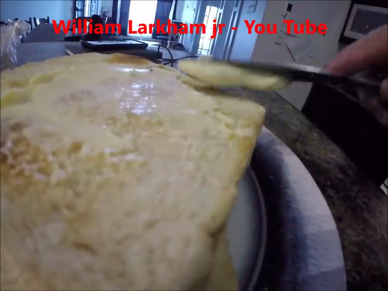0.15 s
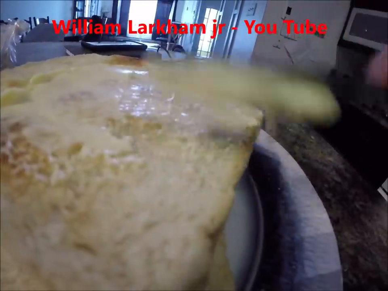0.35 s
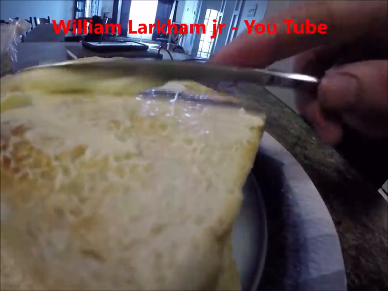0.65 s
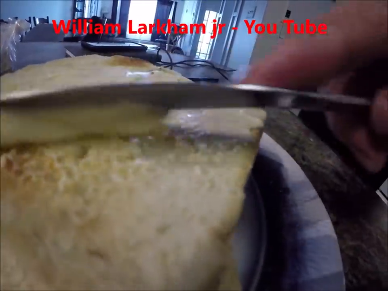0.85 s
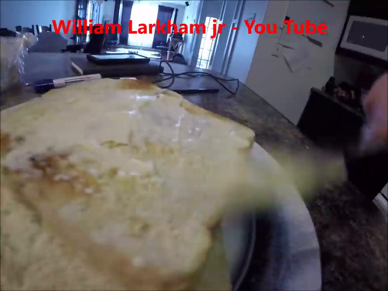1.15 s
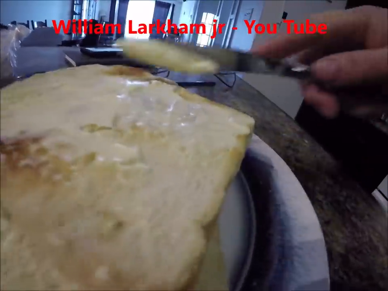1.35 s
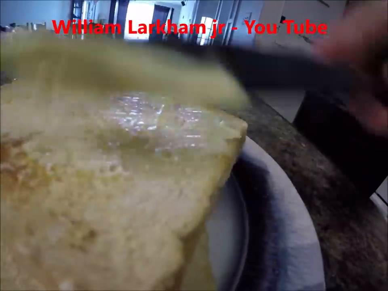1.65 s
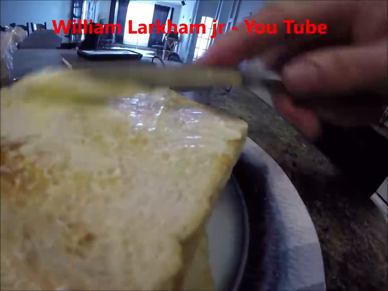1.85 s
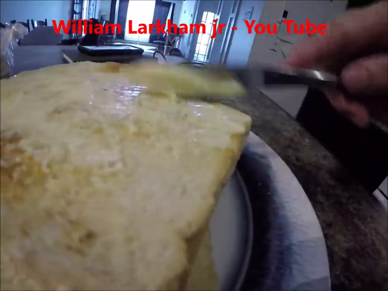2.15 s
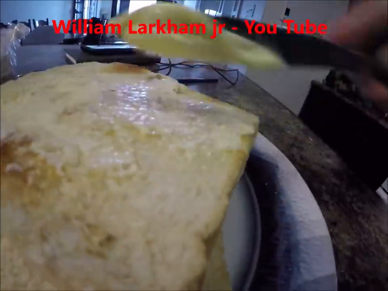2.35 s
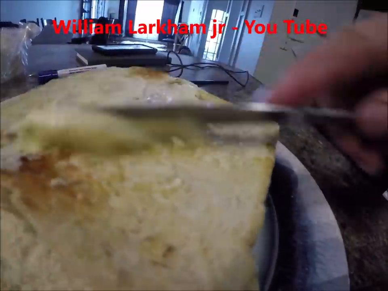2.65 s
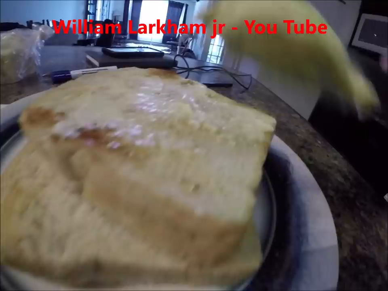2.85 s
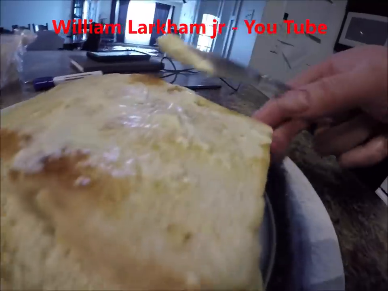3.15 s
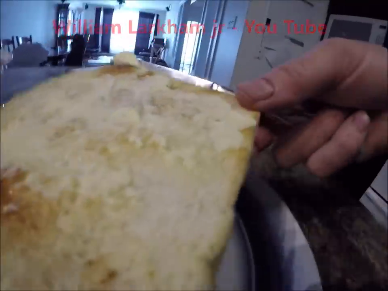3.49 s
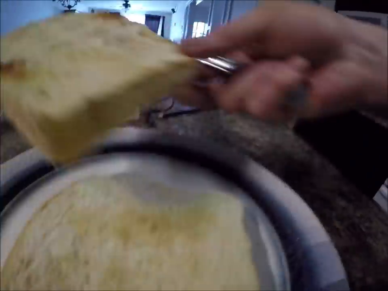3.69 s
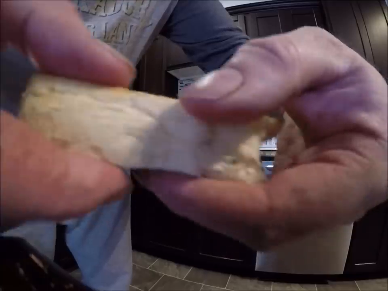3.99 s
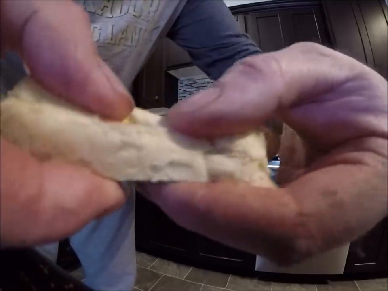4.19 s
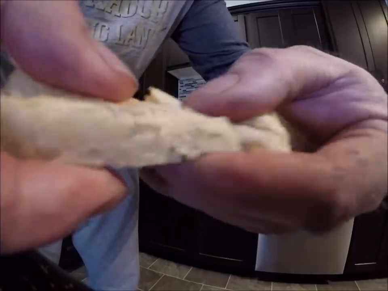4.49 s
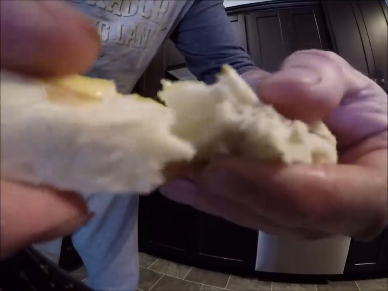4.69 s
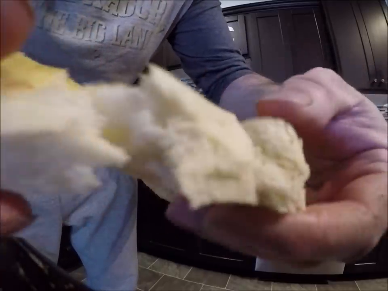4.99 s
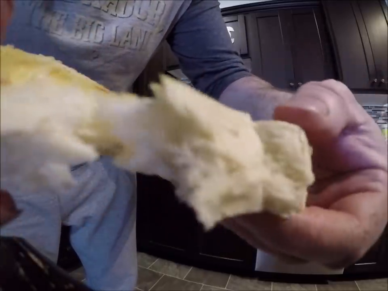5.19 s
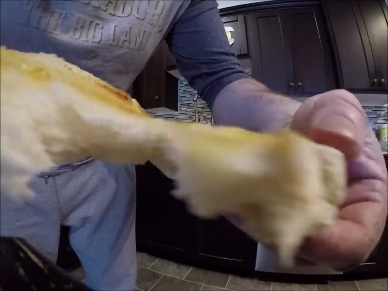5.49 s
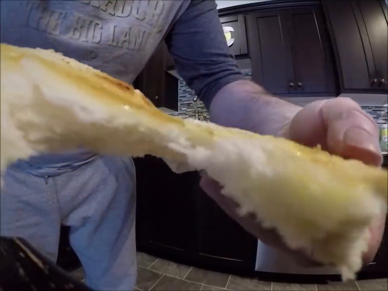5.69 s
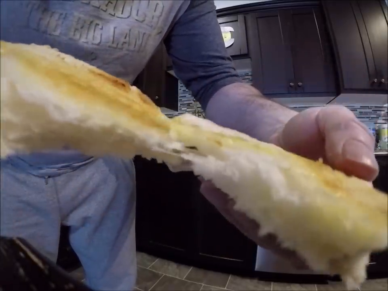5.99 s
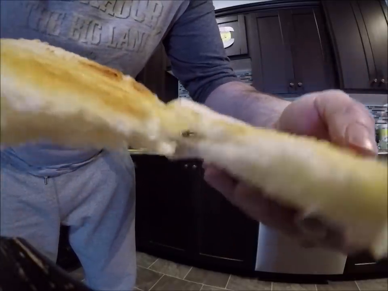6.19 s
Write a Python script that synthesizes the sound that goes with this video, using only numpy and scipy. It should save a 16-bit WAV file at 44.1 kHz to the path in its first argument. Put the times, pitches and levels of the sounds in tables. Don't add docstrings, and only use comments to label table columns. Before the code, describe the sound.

Quick crisp rasps of a knife buttering crusty toast, a plate clink and low bumps, a brief dropout, then soft bread tearing with small crust snaps.

```python
import sys
import numpy as np
from scipy import signal
from scipy.fft import rfft, irfft, next_fast_len
from scipy.io import wavfile
from scipy.ndimage import uniform_filter1d

SR = 44100
rng = np.random.default_rng(int(sys.argv[2]) if len(sys.argv) > 2 else 0)


def wrap_up_sound(samples):
    columns = np.atleast_2d(samples).T
    tamed = np.clip(columns, -1, 1)
    steps = np.round(tamed * 32767).astype(np.int16)
    wavfile.write(sys.argv[1], SR, steps)


def elevation(decibels):
    levels = np.asarray(decibels, float)
    return 10 ** (levels / 20)


N = 279368
TIME = np.arange(N) / SR
SIZE = next_fast_len(N)
HZ = np.maximum(np.fft.rfftfreq(SIZE, 1 / SR), 1)
DROP_S = 3.8278, 3.8612

# (start [s], length [s], pressure peak [0-1 of length], peak pressure [dB], blade speed [dB])
STROKES = [(0.0, 0.13, 0.58, -25.5, -30.5), (0.349, 0.027, 0.2, -39, -39), (0.365, 0.09, 0.52, -25.5, -29),
           (0.814, 0.063, 0.57, -32.5, -30), (0.876, 0.14, 0.39, -37, -34.5), (0.992, 0.067, 1, -34, -36),
           (1.045, 0.225, 0.13, -32.5, -31), (1.145, 0.11, 0.6, -31.5, -24),
           (1.544, 0.025, 0.88, -30.5, -29.5), (1.58, 0.022, 0.6, -25, -23),
           (1.607, 0.045, 0.62, -25, -31.5), (1.646, 0.1, 0.58, -22.5, -28), (2.012, 0.1, 0.34, -25, -29),
           (2.114, 0.02, 0.72, -25, -32), (2.316, 0.09, 0.88, -21, -32), (2.629, 0.12, 0.33, -33.5, -33),
           (2.756, 0.11, 0.7, -23.5, -30), (2.846, 0.048, 0.66, -21.5, -30)]
# (crust dryness [dB], slice boom [Hz], blade top [dB])
TOAST = [(0, 510, 0.5), (3, 600, 4), (-2, 370, -1.5), (-6, 730, -0.5), (-5, 570, -5.5), (1.5, 740, 0.5),
         (0, 380, -1.5), (-0.5, 330, -2), (0.5, 450, 2), (-4, 660, -2), (-2, 570, 2.5), (-0.5, 460, 3),
         (1.5, 530, 5.5), (1, 420, 6), (-0.5, 446, 5.5), (1, 770, -6), (1, 470, 6), (1, 500, -2)]
# (time [s], peak [dB], crackle [dB], blade
# [dB])
CATCHES = [(0.34, -11.5, -11, -13.5), (0.366, -10.5, -17, -28), (0.0572, -21, -3, 0.5),
           (0.3822, -21.5, -2.5, -7), (0.625, -51, -3, -5), (0.748, -35, -17, -12), (0.787, -49, -3, -3),
           (0.8305, -28, -11, -7), (0.949, -27, -10, -4), (1.0375, -31, -11, 0), (1.069, -22.5, -18, 1),
           (1.183, -19, -12, 2), (1.667, -23, -10, -14), (2.0291, -19.5, -1, -10), (2.65, -27, -10, 3),
           (2.717, -30, -5, 1), (2.7964, -21, 0, -7), (0.812, -31, -12, 2.5), (1.006, -24, -7, 0),
           (1.087, -24, -2, -12), (1.131, -22, -1, 0), (1.164, -24, -13, 7), (1.545, -30, 2.5, 2),
           (1.555, -34, -18, -10), (1.585, -18, -12, -9), (1.633, -9.5, -22, -10), (1.999, -25.5, -17, -17),
           (2.011, -25, -13, -2), (2.313, -9, -10, -10), (2.355, -11.5, -10, -6.5),
           (2.639, -25.5, -28, 3.5), (2.686, -31, 6, 0), (2.766, -22, -6, -7), (2.815, -12, -28, -6.5),
           (2.86, -10.5, -24, -3.5), (2.88, -21.5, -21, 7), (3.273, -28, -11, -3), (3.498, -32, -8, -17),
           (3.635, -16.5, -18, -26)]
# (time [s], length [s], depth [dB])
STICKS = [(0.903, 0.01, -7), (0.932, 0.018, -3.5), (1.03, 0.018, -2.5), (1.082, 0.0027, -4),
          (1.18, .007, -5), (1.197, 0.0068, -3.5), (1.61, 0.0054, 1), (1.663, .008, -3), (1.57, 0.0085, -3),
          (2.677, 0.0074, -7.5), (2.75, 0.0087, -10), (2.808, 0.0071, -5), (2.845, 0.021, -4),
          (2.88, 0.012, -6)]
# (time [s], pitch [Hz])
ANGLE = [(0, 6350), (.3, 6140), (.46, 6300), (.81, 7200), (1.0, 7200), (1.07, 7650), (1.13, 6600),
         (1.19, 6500), (1.24, 7440), (1.55, 6100), (1.75, 6560), (2.0, 6660), (2.3, 5600), (2.42, 5900),
         (2.64, 6200), (2.77, 6300), (2.9, 7140)]
# (frequency [Hz], level per Hz [dB])
CRUMB = [(60, -28), (130, -10), (270, -4.5), (420, -1), (600, 3), (850, -3.5), (1200, -6.5), (1550, -9),
         (1780, -19.5), (3000, -58)]
CRACKLE = [(1000, -16.5), (1800, 10), (2500, 6.5), (3000, 1.5), (4000, 3.5), (4700, 4), (5500, -24)]
BLADE = [(3500, -49.5), (5000, 3.5), (5600, 14), (7800, 5.5), (8800, 5), (10300, -10), (12500, -7.5),
         (14000, -16), (16000, -47)]
STROKE_SHAPE = 0.0034, 11, 7.7, 0.011
BLADE_FOLLOWS, CRUST_FOLLOWS = 0.74, 0.28
CRUST_FROM_SPEED, CRUST_DB = 0.92, -9


def knife():
    slip = grains(rate_hz=7000, spread_db=2.5, patchy_db=2.0, patch_hz=86.0)
    chatter = grains(rate_hz=7000, spread_db=2.5, patchy_db=2.0, patch_hz=86.0)
    stuck_db = sum(depth_db * np.exp(-((TIME[:3 * SR] - at) / hold) ** 4) for at, hold, depth_db in STICKS)
    slip[:3 * SR] *= elevation(stuck_db)
    chatter[:3 * SR] *= elevation(stuck_db)

    start, length, peak, press_db, speed_db = np.transpose(STROKES)
    dry_db, _, top_db = np.transpose(TOAST)
    crust_db = CRUST_DB + dry_db + press_db + CRUST_FROM_SPEED * (speed_db - press_db)
    crumb = swells(start, length, peak, press_db, STROKE_SHAPE)
    crust = swells(start, length, peak, crust_db, STROKE_SHAPE, CRUST_FOLLOWS)
    steel = swells(start, length, peak, speed_db, STROKE_SHAPE, BLADE_FOLLOWS)

    s, db, crackle_db, blade_db = np.transpose(CATCHES)
    edge = chatter * steel + bursts(s, elevation(db + blade_db - 2.5), decay_s=0.0039)
    lag = 2 * SR / np.interp(TIME, *np.transpose(ANGLE)) + walk(29.12)
    mirrored = edge + 0.31 * np.interp(np.arange(N) - lag, np.arange(N), edge)
    rings = elevation(9) * blade_rings(edge * np.clip(steel / (crumb + 1e-9), 0.35, 1))
    ringing = elevation(-6.0) * causal(mirrored, unit(colour(BLADE))) + rings
    below = signal.sosfiltfilt(signal.butter(3, 8400, fs=SR, output="sos"), ringing)
    ringing = below + (ringing - below) * elevation(per_stroke(top_db))

    boom = booms(slip * crumb ** 1.774) * elevation(38.5)
    soft = slip * crumb + bursts(s, elevation(db - 14.5), decay_s=0.0076)
    crackle = (0.74 * slip + 0.5 * chatter) * crust
    crackle += bursts(s, elevation(db + crackle_db - 5.5), decay_s=0.0025)
    soft, crackle = causal(soft, unit(colour(CRUMB))), causal(crackle, unit(colour(CRACKLE)))
    return soft + boom + crackle + ringing + singing(chatter)


def per_stroke(values):
    landed = np.searchsorted(np.transpose(STROKES)[0] - 0.004, TIME) - 1
    return np.asarray(values)[np.maximum(landed, 0)]


def booms(drive):
    x = np.zeros(N)
    edges = [int(row[0] * SR) for row in STROKES] + [3 * SR]
    for i, j, (_, hz, _) in zip(edges, edges[1:], TOAST):
        part = signal.lfilter(*signal.iirpeak(hz, 2.5, SR), np.r_[drive[i:j], np.zeros(2000)])
        x[i:i + len(part)] += part
    return x


BLADE_HZ = [2050, 4220, 5600, 6200, 6380, 7300, 7560, 8750, 9800, 12400]
BLADE_DB = [-9, -11, -6, 0, -3, -3, -2, -9, -5, -17]


def blade_rings(drive):
    x = np.zeros(N)
    for hz, db in zip(BLADE_HZ, BLADE_DB):
        x += elevation(db) * signal.lfilter(*signal.iirpeak(hz, 45, SR), drive * elevation(6 * walk(20)))
    return x


# (start [s], length [s], mode [Hz], level
# [dB])
SINGS = [(0.0, 0.14, 6150, -42), (0.02, 0.1, 1390, -35), (0.372, 0.043, 1490, -28),
         (0.412, 0.048, 373, -26.5), (1.647, 0.078, 780, -34), (2.02, 0.057, 560, -33),
         (2.357, 0.065, 397, -27.5), (2.813, 0.055, 560, -35), (2.846, 0.056, 484, -26),
         (3.496, 0.065, 1990, -42), (3.564, .025, 1090, -36), (5.152, 0.088, 610, -53),
         (0.918, .07, 1520, -43), (1.015, .06, 1410, -34), (1.62, 0.038, 560, -33), (1.727, .02, 446, -41),
         (1.15, .05, 4180, -37), (5.37, 0.077, 635, -52), (0.373, 0.058, 6260, -36),
         (0.386, 0.042, 3800, -40), (0.815, 0.087, 9700, -45), (0.82, 0.05, 7850, -47),
         (0.84, .03, 4070, -40.5), (0.945, .06, 7250, -42), (0.95, .06, 4100, -45), (0.95, .07, 6100, -48),
         (1.04, 0.071, 7400, -43), (1.056, .03, 9400, -41), (1.08, 0.046, 6950, -32),
         (1.105, 0.11, 6440, -30), (1.112, .09, 9620, -34.5), (1.154, 0.033, 7600, -35),
         (1.125, 0.085, 2040, -38.5), (1.201, 0.054, 7400, -33), (1.215, 0.034, 4250, -31.5),
         (1.224, 0.034, 5480, -32), (1.593, 0.02, 6000, -39), (1.677, 0.057, 6300, -40),
         (1.603, 0.23, 7750, -50), (2.023, 0.13, 6280, -38), (2.024, 0.13, 7400, -43),
         (2.314, 0.076, 5580, -35), (2.31, 0.075, 7580, -36.5), (2.638, .095, 6300, -41),
         (2.64, 0.075, 7500, -42), (2.647, .08, 5500, -45), (2.756, 0.022, 6200, -37),
         (2.849, 0.052, 7300, -31),
         (0.0, 0.032, 1440, -33),
    (0.105, 0.021, 496, -29),
    (0.838, 0.026, 200, -37),
    (0.93, 0.079, 218, -34.5),
    (1.12, .028, 500, -30),
    (1.2, .03, 390, -29.5),
    (4.7, .1, 320, -41),
    (2.7, .04, 1440, -34),
    (2.8, .04, 1430, -38),
]
SING_WIDTH_HZ, SING_DB = 130, 23


def singing(drive):
    x = np.zeros(N)
    for s, length, hz, db in SINGS:
        i, n = int(s * SR), int(length * SR)
        fed = np.r_[drive[i:i + n] * np.hanning(n) ** 0.4, np.zeros(400)]
        x[i:i + n + 400] += elevation(db + SING_DB) * signal.lfilter(*signal.iirpeak(hz, hz / SING_WIDTH_HZ, SR), fed)
    return x


# (start [s], length [s], peak [0-1 of length], squeeze [dB], rip [dB])
TEAR = [(3.421, 0.036, 0.9, -44, -63), (3.5, 0.029, 0.11, -30, -57.5), (3.524, 0.048, 0.34, -33, -66),
        (3.527, 0.064, 0.45, -46, -51), (3.635, 0.033, 0, -44, -53), (3.663, 0.039, 1, -39, -45.5),
        (3.851, 0.029, 1, -50.5, -66), (4.22, 0.085, 0.75, -40.5, -48.5), (4.417, 0.14, 0.2, -55, -61.5),
        (4.553, 0.044, 0.57, -50, -56), (4.608, 0.068, 0.35, -46.5, -53), (4.675, 0.056, 0.3, -47.5, -60),
        (4.718, 0.09, 0.3, -49.5, -66), (4.857, 0.024, 0.4, -46.5, -58.5), (4.972, 0.071, 0.4, -54, -62),
        (5.122, 0.043, 0.97, -54.5, -63.5), (5.36, 0.14, .6, -56, -71), (5.442, 0.38, 0.14, -56, -78)]
# (time [s], peak [dB], low share [dB])
SNAPS = [(3.8148, -34.5, -11), (3.566, -41, -20), (3.575, -36, -20), (3.558, -47, -5), (3.581, -42, 0),
         (4.2125, -44, -14), (4.2365, -26, -10), (4.247, -39, -10), (4.2515, -40, -7), (4.2675, -37, -15),
         (4.2865, -26.5, -5.5), (4.2985, -31, -7), (4.3345, -36, -17), (4.362, -40, -16), (4.601, -34, -6),
         (4.612, -36.5, 0), (4.988, -41, -5), (5.561, -42, -13), (4.864, -47, -3), (3.597, -38, 2),
         (3.9238, -43.5, 4), (3.9912, -37.5, -26), (4.1918, -40.5, -7), (4.223, -35, -18),
         (4.232, -30, -10), (4.2647, -22, -7), (4.283, -29, -9), (4.305, -22, 0), (4.328, -26, -5),
         (4.4297, -44, -7), (4.4645, -42, 0), (4.5027, -40, 2), (4.532, -31, -14), (4.544, -30, -11),
         (4.562, -40, -15), (4.606, -32.5, -5), (4.654, -43.5, 9), (4.7244, -35, -5), (4.85, -35, -15),
         (5.3043, -40.5, -9), (5.4046, -47, -13), (5.464, -37, -8), (5.5, -44, 0), (5.5305, -40.5, -16),
         (5.597, -36, -9), (5.9095, -41, -22), (5.9836, -44, -20)]
# (frequency [Hz], level per Hz [dB])
FRAY = [(3500, -38), (5000, 0.5), (6500, 4), (9500, 1.5), (11000, -5.5), (13500, -10.5), (15500, -13)]
TEAR_SHAPE = 0.038, 8.4, 6.9, 0.066
RIP_FOLLOWS, RIP_CRUST_DB = 0.64, -5


def tearing():
    rustle = grains(rate_hz=4600, spread_db=2.5, patchy_db=8.0, patch_hz=50.4)
    rip, fray = (grains(rate_hz=2500, spread_db=4.5, patchy_db=4.5, patch_hz=71.0) for _ in range(2))
    start, length, peak, squeeze_db, rip_db = np.transpose(TEAR)
    crust_db = RIP_CRUST_DB + (squeeze_db + rip_db) / 2
    crumb = swells(start, length, peak, squeeze_db, TEAR_SHAPE)
    crust = swells(start, length, peak, crust_db, TEAR_SHAPE, RIP_FOLLOWS)
    fizz = swells(start, length, peak, rip_db, TEAR_SHAPE, RIP_FOLLOWS)
    s, db, low_db = np.transpose(SNAPS)
    snap = bursts(s, elevation(db - 3.0), decay_s=0.00093)
    pop = bursts(s, elevation(db + low_db + 2), decay_s=0.00087)

    soft = causal(rustle * crumb, unit(colour(CRUMB) * (HZ / 800) ** 0.17))
    soft_pop = causal(pop, unit(colour(CRUMB) * (HZ / 800) ** 0.59))
    crackle = causal((1.39 * rip + 0.63 * rustle) * crust + pop * elevation(-5.0), unit(colour(CRACKLE)))
    sharp = causal((1.23 * rip + 1.15 * fray) * fizz + snap * elevation(-3.5), unit(colour(FRAY)))
    return soft + soft_pop + crackle + sharp


# (time [s], ring [dB], thud [dB], brightness [dB per octave])
KNOCKS = [
    (3.273, -24, -14, 0.5),
    (3.443, -65, -31.5, 6),
    (3.468, -70, -36, 1),
]
RIM_TAPS = [
    (3.635, -22.5, -20, -4),
    (3.6835, -17, -29.5, -16),
    (3.77, -41, -60, 3),
    (3.722, -54, -45, -3),
]
TINKS = [
    (3.12, -42.5, -58, 0.0068),
    (3.325, -44, -29, 0),
]
# (frequency [Hz], level [dB], t60 [s])
PLATE = [(610, 1.5, 0.12), (717, 12.5, 0.033), (1367, 8, 0.042), (5150, -13.5, 0.076), (2598, -29, 0.31),
         (1860, -7.5, 0.15), (1790, -3.5, 0.08), (2605, -5.5, 0.13), (3370, -5, 0.04), (4220, -16, 0.045),
         (6100, -5, 0.068), (7100, -10, 0.054), (8300, -8, 0.039), (9400, -15, 0.052)]
RIM = [(1319, 8, 0.035), (1345, -24, 0.05), (1790, -14, 0.05), (2100, -9, 0.06), (2600, -16, 0.06),
       (3290, -10, 0.06), (7460, -14, 0.08)]
TIP = [(7700, -1, 0.17), (9000, -2.5, 0.046), (6100, -5, .04), (7300, -5, .05)]
COUNTER = [(173.8, 8, 0.12), (118.5, 4, 0.12), (248, -17, 0.041), (525, -9.5, 0.13), (700, -12, 0.056)]


def plate(knocks, ring_modes, rise_s=0.0016):
    x, t = np.zeros(N), np.arange(SR // 3) / SR
    chance = rng.standard_normal((len(knocks), 2, 40))
    for (s, ring_db, thud_db, tilt_db), (sizes, starts) in zip(knocks, chance):
        modes = [(f, db + ring_db + tilt_db * np.log2(f / 1500), d) for f, db, d in ring_modes]
        modes += [(0.71 * f, db - 26, 0.61 * d) for f, db, d in modes]
        modes += [(f, db + thud_db, d) for f, db, d in COUNTER]
        sound = np.zeros(len(t))
        for (f, db, t60), uneven_db, phase in zip(modes, sizes, starts):
            rise = np.minimum(t / (0.0085 if f < 300 else rise_s), 1)
            sound += elevation(db + uneven_db) * np.sin(2 * np.pi * f * t + phase) * 1000 ** (-t / t60) * rise
        x[int(s * SR):][:len(t)] += sound
    return x


# (start [s], length [s], level [dB], upper part [dB])
JOLTS = [(0.0, 0.13, -36, -2), (0.28, 0.28, -34, -14), (0.71, 0.028, -45.5, -22), (0.853, 0.23, -38, -8),
         (1.05, 0.42, -49, -15), (1.724, 0.063, -29.5, -7), (1.88, 0.043, -56, -2), (2.039, 0.094, -30, -1),
         (2.189, 0.052, -28.5, -24), (2.335, .1, -24, -9), (2.609, 0.13, -29, -0.5),
         (2.798, 0.081, -17.5, -11.5), (2.985, 0.17, -27.5, -10.5), (3.143, 0.29, -28.5, -6.5),
         (3.434, 0.087, -19.5, -11.5), (3.539, 0.056, -12.5, -9.5), (3.633, 0.087, -29.5, 1.5),
         (3.681, 0.16, -23, -18), (3.87, 0.27, -47, 5), (4.19, 0.2, -45, -1), (4.42, .03, -40, -8),
         (4.625, .03, -43, -13), (4.858, .03, -47, 5), (4.95, 0.35, -53, 2), (6.29, 0.054, -43, 3)]
# (start [s], length [s], level [dB])
GRIP = [(3.846, 0.021, -41.5), (4.224, 0.021, -24.5), (4.269, 0.077, -33.5), (4.432, 0.022, -32),
        (4.469, 0.028, -29.5), (4.52, 0.052, -34), (4.556, 0.077, -33.5), (4.675, 0.062, -25.5),
        (4.731, 0.053, -25), (4.795, 0.02, -34), (4.856, 0.2, -42.5), (5.116, 0.072, -44.5),
        (5.381, 0.13, -33), (5.567, 0.095, -46), (5.76, 0.099, -42.5), (5.951, 0.03, -41),
        (6.052, 0.031, -52), (6.144, 0.064, -49), (6.245, .15, -43)]
# (frequency [Hz], level per Hz [dB])
SHAKE_LOW = [(12, -11), (25, 16), (40, 13), (55, 2), (80, -45.5)]
SHAKE_HIGH = [(40, -14.5), (62, 2), (90, -10), (140, -15), (250, -26.5), (500, -63.5)]
GRIP_COLOUR = [(30, -20), (85, -5.5), (125, -43), (140, 5.5), (160, 11.5), (185, 5.5), (220, -3),
               (320, -14.5), (700, -24)]
JOLT_SHAPE, JOLT_PEAK = (0.063, 10.4, 8.1, 0.14), 0.41
GRIP_SHAPE, GRIP_PEAK, GRIP_REST_DB = (0.029, 3, 9.9, 0.04), 0.58, -51.5
COUNTER_DB, COUNTER_UPPER_DB = -44, -5.5
BODY_LEFT_DB = 11.5


def camera_body():
    s, length, db, upper_db = np.transpose(JOLTS)
    busy = TIME < DROP_S[0]
    jolts = [rng.standard_normal(N) * elevation(2.3 * walk(20)) for _ in range(4)]
    lower = swells(s, length, JOLT_PEAK, db, JOLT_SHAPE) + elevation(COUNTER_DB) * busy
    low = steady(causal(jolts[0], unit(colour(SHAKE_LOW), False)), span_s=0.062) * lower
    upper = swells(s, length, JOLT_PEAK, db + upper_db, JOLT_SHAPE) + elevation(COUNTER_DB + COUNTER_UPPER_DB) * busy
    high = [causal(j, unit(colour(SHAKE_HIGH), False)) * upper for j in jolts[1:3]]
    s, length, db = np.transpose(GRIP)
    squeeze = swells(s, length, GRIP_PEAK, db, GRIP_SHAPE) + elevation(GRIP_REST_DB) * ~busy
    grip = causal(jolts[3] * elevation(0.99 * walk(25)), unit(colour(GRIP_COLOUR), False))
    grip = steady(grip, span_s=0.015) * squeeze
    left = elevation(BODY_LEFT_DB)
    both = [left * (low + grip + high[0]), low + grip + 0.89 * high[0] + 1.47 * high[1]]
    return np.array(both) * 2 / (1 + left)


def steady(x, span_s, share=0.68):
    span = int(span_s * SR)
    power = uniform_filter1d(uniform_filter1d(x ** 2, span), span)
    return x / (power + 1e-9) ** (share / 2)


def room(source):
    t = TIME[:SR]
    t60_s = np.array([[0.77], [0.77], [0.03], [0.39]])
    tail = rng.standard_normal((4, SR)) * 1000 ** (-t / t60_s) * (t > 0.001)
    tail /= np.sqrt(np.sum(tail ** 2, axis=1, keepdims=True))
    wall, side_wall, housing, tiles = (ports(signal.fftconvolve(source, r)[:N]) for r in tail)
    late = signal.lfilter([0.45], [1, -0.55], wall + 0.5 * side_wall * np.array([[-1], [1]]))
    band = signal.butter(2, (1700, 5000), "band", fs=SR, output="sos")
    behind = signal.sosfilt(band, tiles[1] * np.array([[1], [0.3]]))
    treble = signal.butter(2, 1800, "high", fs=SR, output="sos")
    scatter = signal.sosfilt(treble, housing[0]) * elevation(-2) * walk(200)
    return elevation(-20.5) * late + elevation(-19) * behind + elevation(-18) * tiles + np.array([scatter, 0 * scatter])


# (frequency [Hz], level per Hz [dB])
KITCHEN = [(110, -19), (150, 9), (450, -3), (800, -3), (1200, -8), (1600, -13), (2500, -18), (4000, -28),
           (5500, -28), (7500, -23), (10500, -24.5), (15000, -64)]
HISS = [(30, 1), (160, -8), (300, -0.5), (1000, -15), (3000, -19), (8000, -20.5), (11000, -23),
        (14000, -30.5), (16000, -56)]
KITCHEN_DB, HISS_DB = -53.5, -54


def kitchen():
    tone = causal(rng.standard_normal(N) * elevation(0.7 * walk(3)), unit(colour(KITCHEN)))
    hiss = [causal(rng.standard_normal(N), unit(colour(HISS), False)) for _ in range(2)]
    return elevation(KITCHEN_DB) * ports(tone) + elevation(HISS_DB) * np.array(hiss)


# (frequency [Hz], level [dB], phase [rad])
LEAK = [(100, -38, 2.7), (188, -29, 9.3), (257, -14, 2.7), (427, -9.5, 2.4), (662, -6, 3.22),
        (843, -0.5, 2.544), (1570, -0.5, 2.4), (2830, -1.5, 1.85), (3100, 2, 1.73), (3450, -5, 1.26),
        (3720, 0, 1.3), (4770, -19.5, 0.24), (6160, -24, 1.7), (9000, -33, .7)]


def leak():
    return elevation(on_log(LEAK)) * np.exp(1j * on_log(LEAK, column=2))


def ports(x):
    return np.array([irfft(rfft(x, SIZE) * leak(), SIZE)[:N], x])


def unit(gain, airborne=True):
    mid = (1 + leak()) / 2 if airborne else 1
    return gain / np.sqrt(np.mean(np.abs(gain * mid) ** 2))


def on_log(table, column=1):
    table = np.array(table, float)
    return np.interp(np.log(HZ), np.log(table[:, 0]), table[:, column])


def colour(table):
    beyond = np.log2(np.maximum(np.maximum(HZ / table[-1][0], table[0][0] / HZ), 1))
    return elevation(on_log(table) - 18 * beyond)


def causal(x, gain):
    cep = irfft(np.log(gain), SIZE)
    cep[1:SIZE // 2] *= 2
    cep[SIZE // 2 + 1:] = 0
    return irfft(rfft(x, SIZE) * np.exp(rfft(cep)), SIZE)[:N]


def walk(rate_hz):
    k = int(SR / rate_hz)
    held = np.repeat(rng.standard_normal(N // k + 1), k)
    return 1.05 * uniform_filter1d(uniform_filter1d(held, k), k)[:N]


def grains(rate_hz, spread_db, patchy_db, patch_hz):
    size = elevation(spread_db * np.minimum(rng.exponential(size=N), 4.5) + patchy_db * walk(patch_hz))
    x = rng.standard_normal(N) * size * (rng.random(N) < rate_hz / SR)
    return x / np.sqrt(uniform_filter1d(x ** 2, int(0.03 * SR)) + 1e-12)


def bursts(times, gains, decay_s):
    x = np.zeros(N)
    t = np.arange(400) / SR
    for s, gain in zip(times, gains):
        i = int(s * SR)
        x[i:i + 400] += (gain * rng.standard_normal(400) * np.exp(-t / decay_s))[:N - i]
    return x


def swells(start, length, peak, peak_db, shape, follows=1):
    attack, land_db, lift_db, release = shape
    land_db, lift_db = follows * land_db, follows * lift_db
    steps = TIME[::16]
    end, top = start + length, start + np.clip(peak, 0.02, 0.98) * length
    corners = np.transpose([start - attack, start, top, end, end + release])
    levels = np.array([-land_db - 25, -land_db, 0, -lift_db, -lift_db - 25])
    db = [p + np.interp(steps, c, levels, left=-200, right=-200) for c, p in zip(corners, peak_db)]
    return np.interp(TIME, steps, elevation(np.max(db, axis=0)))


def scene():
    near = knife() + tearing() + plate(KNOCKS, PLATE) + plate(TINKS, TIP)
    taps = plate(RIM_TAPS, RIM, rise_s=0.0062)
    return ports(near + taps) + room(near + 0.5 * taps) + camera_body() + kitchen()


def low_pass(x):
    return signal.sosfilt(signal.butter(12, 15700, fs=SR, output="sos"), x)


def record(dry):
    top_cut = signal.butter(10, 15100, fs=SR, output="sos")
    x = signal.sosfilt(top_cut, np.tanh(1.3 * dry) / 1.3)
    before = x * np.clip((DROP_S[0] + 0.0036 - TIME) * 200, 0, 1)
    after = x * np.clip((TIME - DROP_S[1]) / 0.00082, 0, 1)
    low_cut = signal.ellip(8, 0.5, 50, 137, "high", fs=SR, output="sos")
    after = signal.sosfilt(low_cut, after) + elevation(-19) * after
    return low_pass(before + after)


dry = scene()
out = record(dry)
wrap_up_sound(out)
```